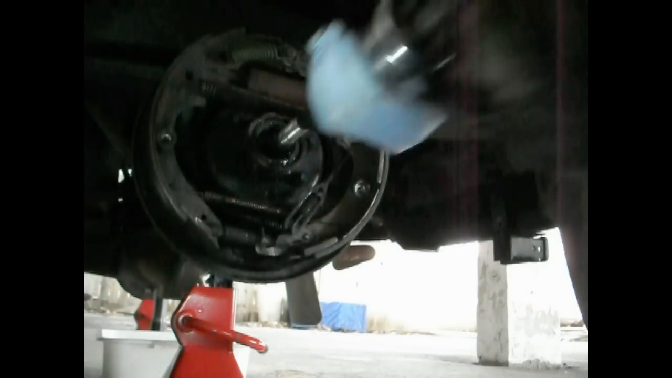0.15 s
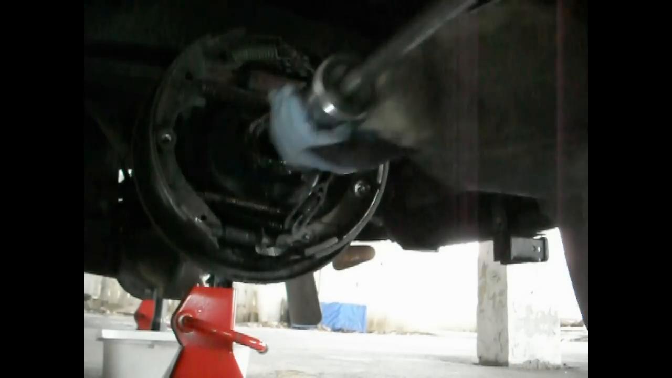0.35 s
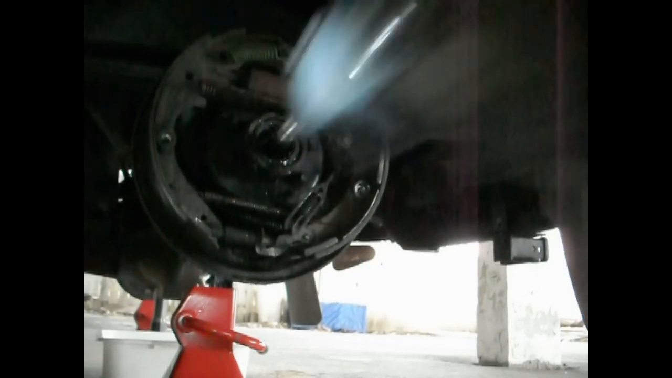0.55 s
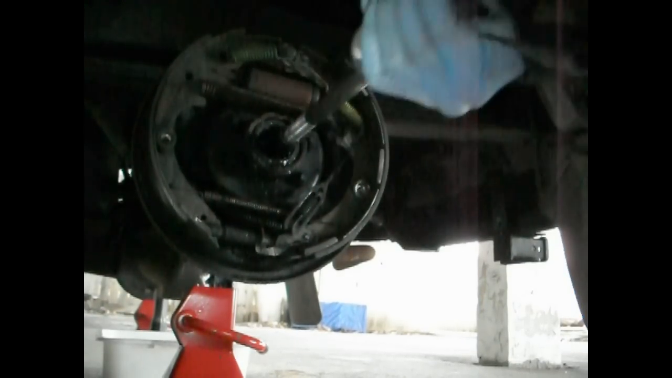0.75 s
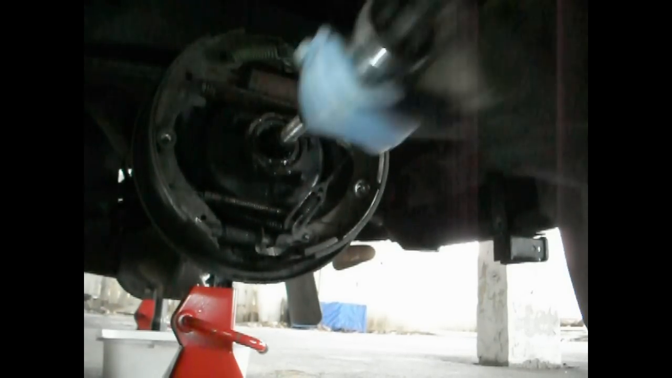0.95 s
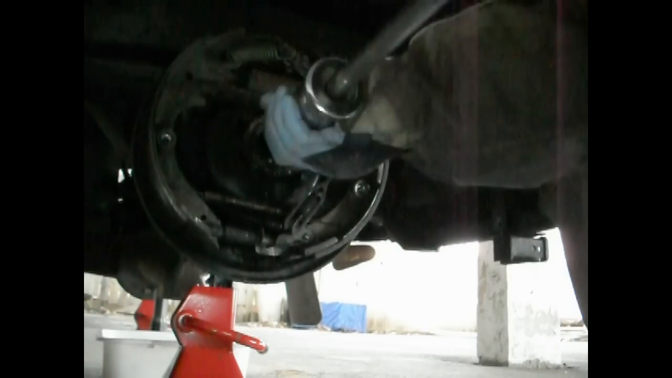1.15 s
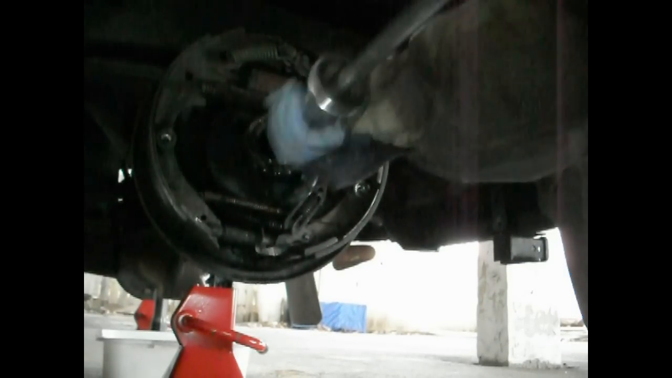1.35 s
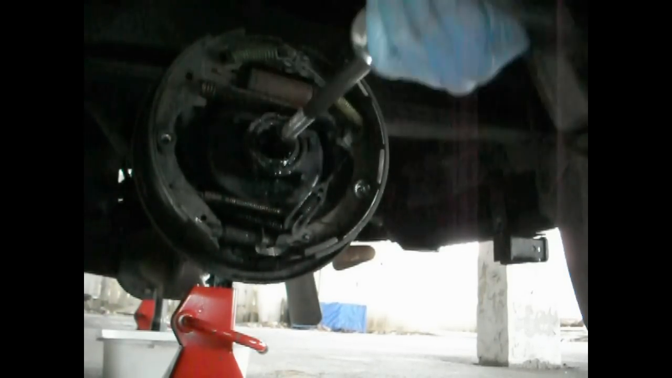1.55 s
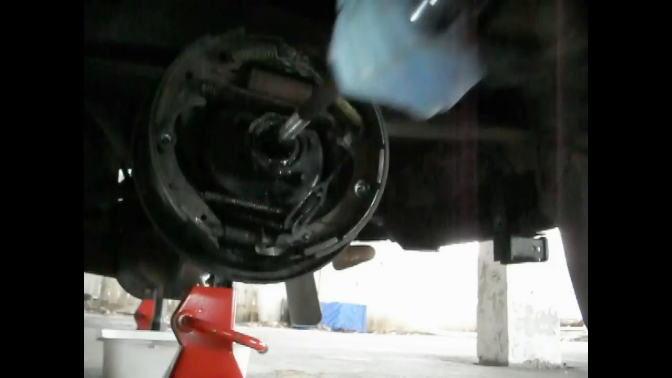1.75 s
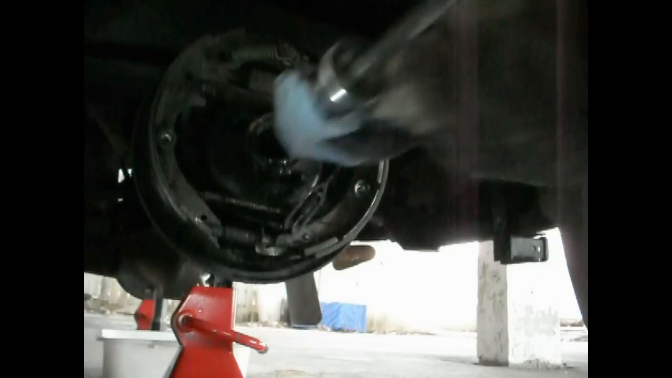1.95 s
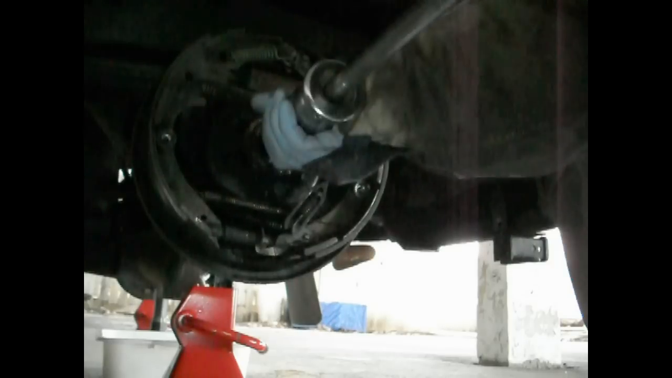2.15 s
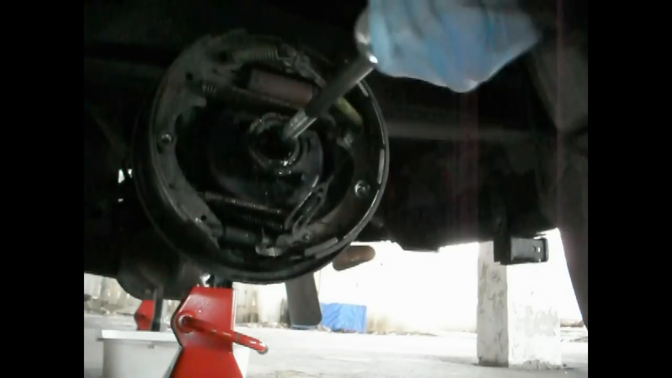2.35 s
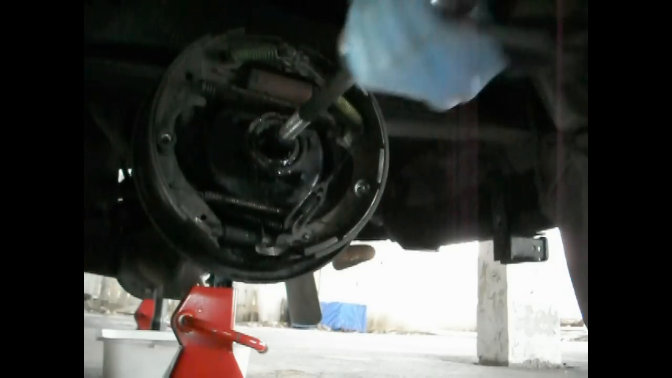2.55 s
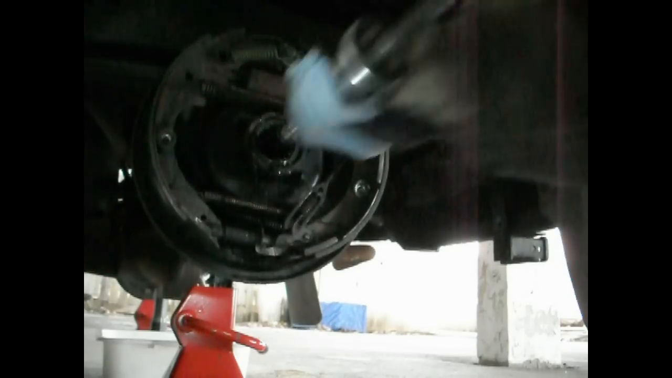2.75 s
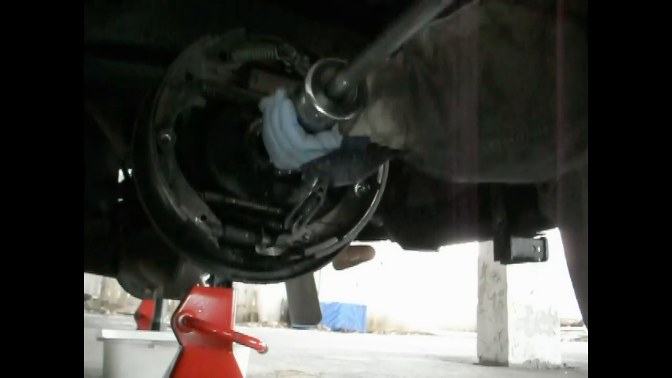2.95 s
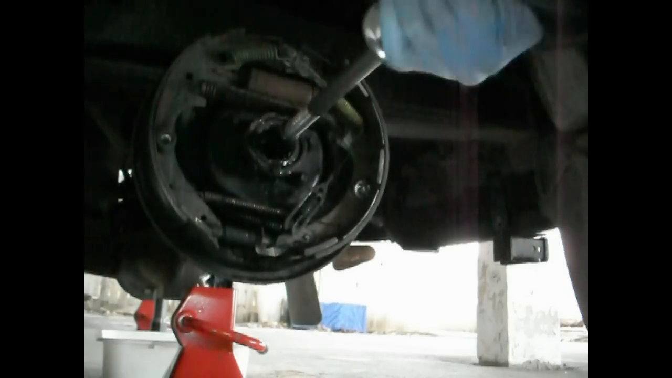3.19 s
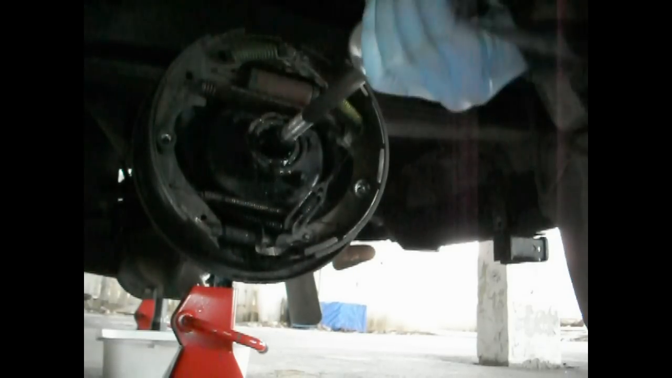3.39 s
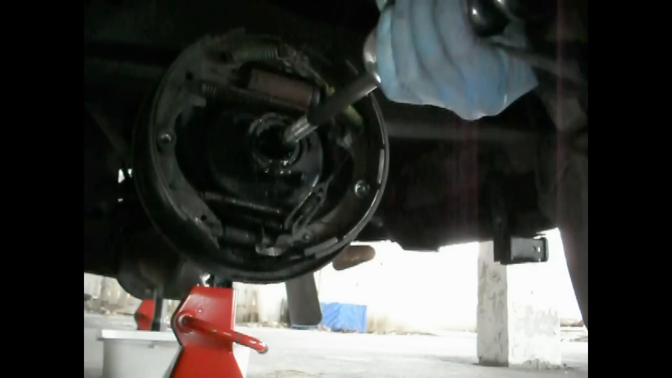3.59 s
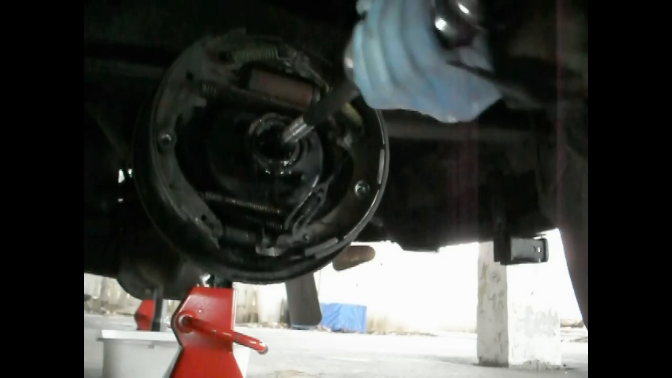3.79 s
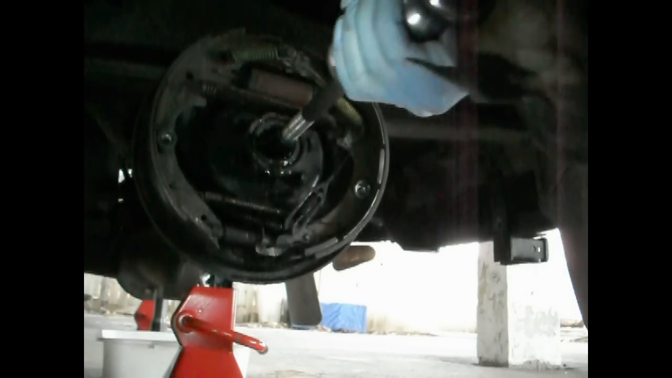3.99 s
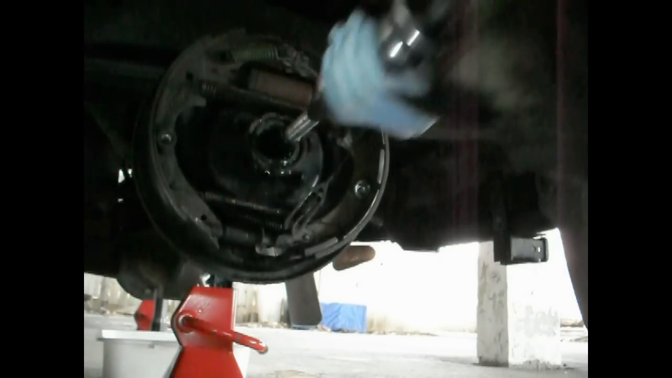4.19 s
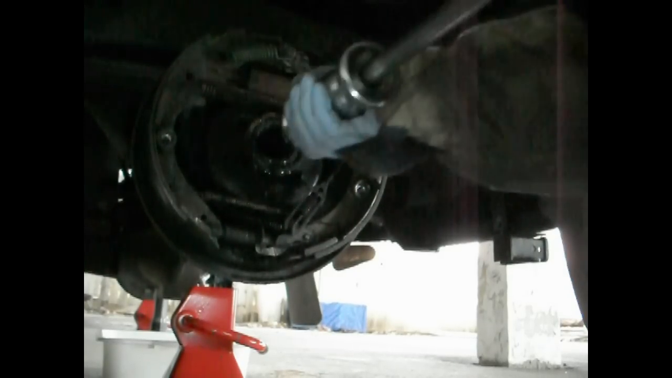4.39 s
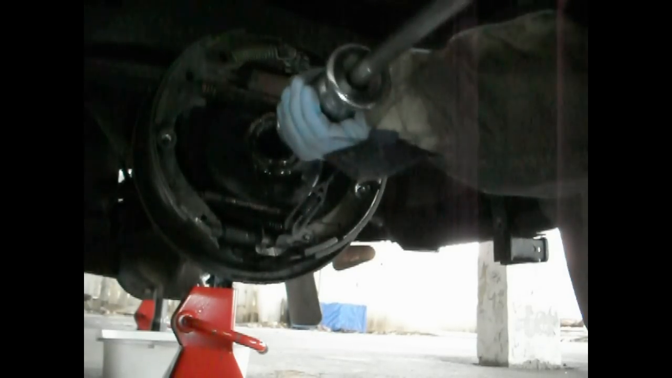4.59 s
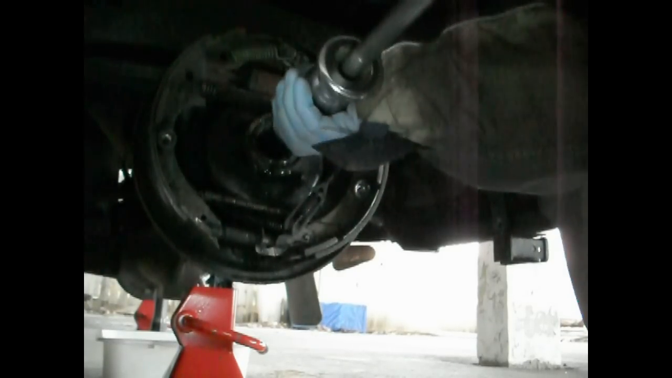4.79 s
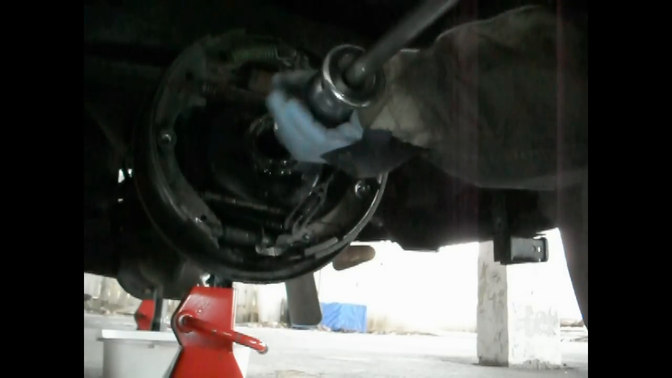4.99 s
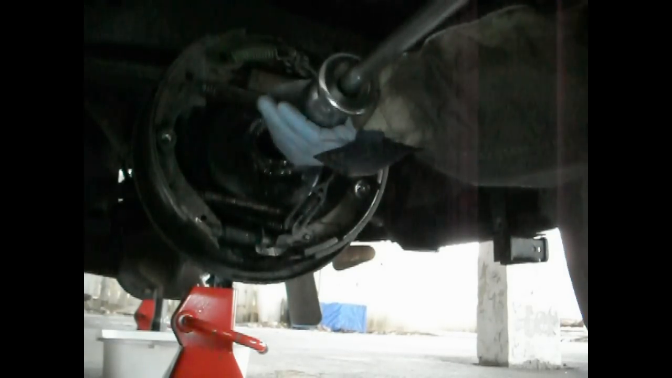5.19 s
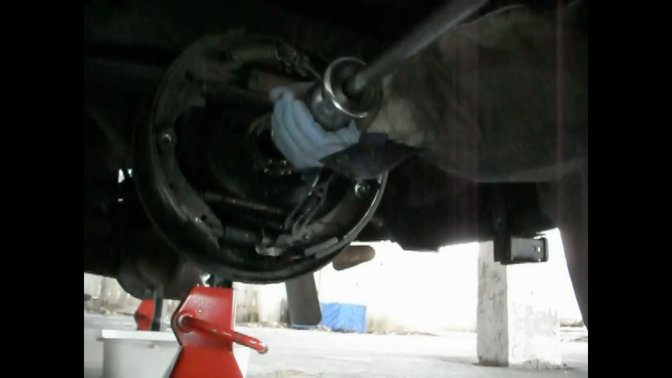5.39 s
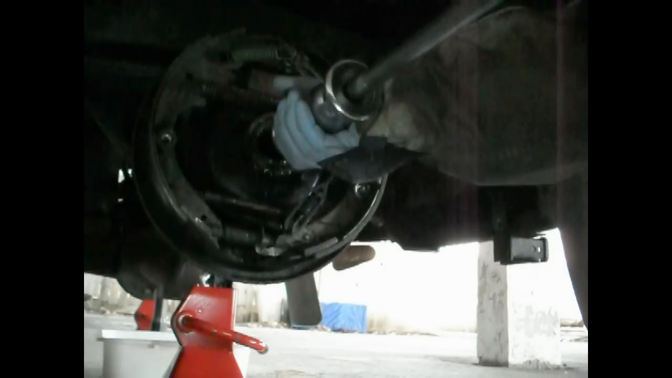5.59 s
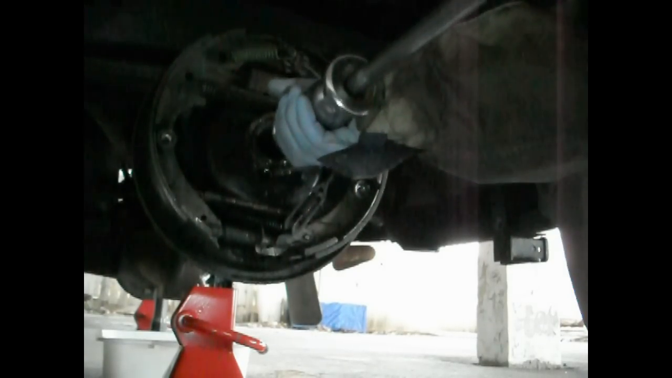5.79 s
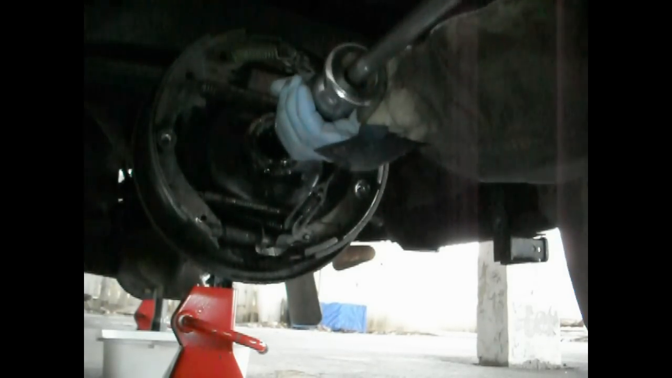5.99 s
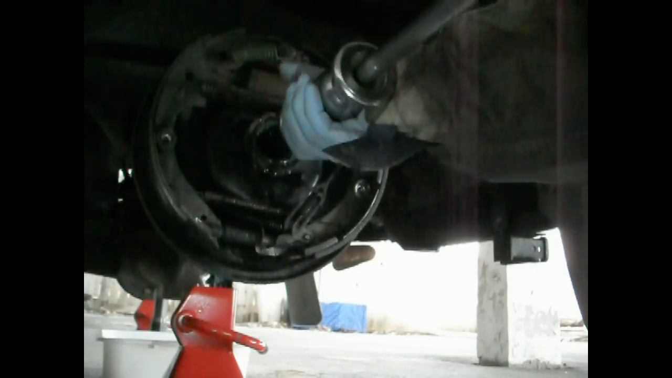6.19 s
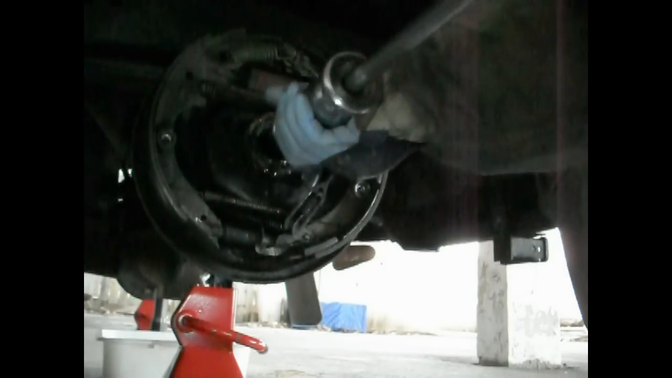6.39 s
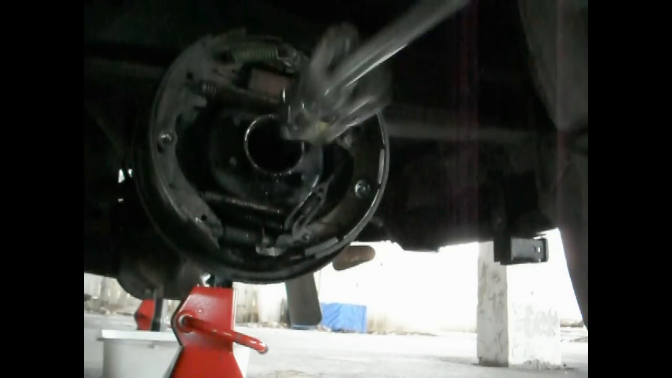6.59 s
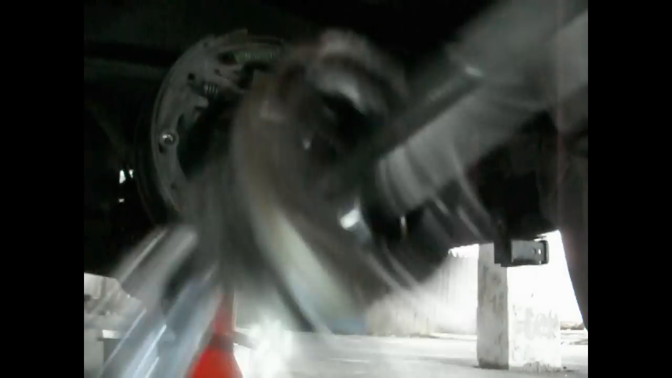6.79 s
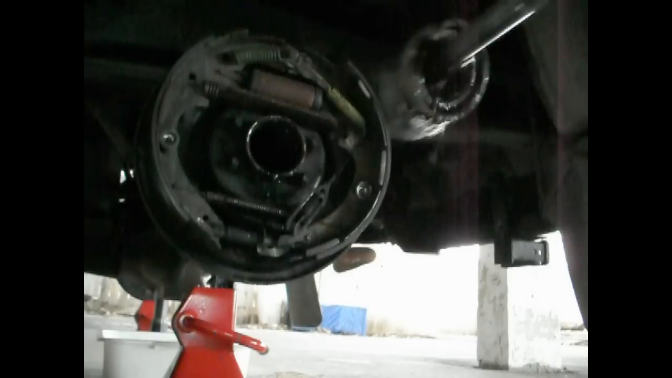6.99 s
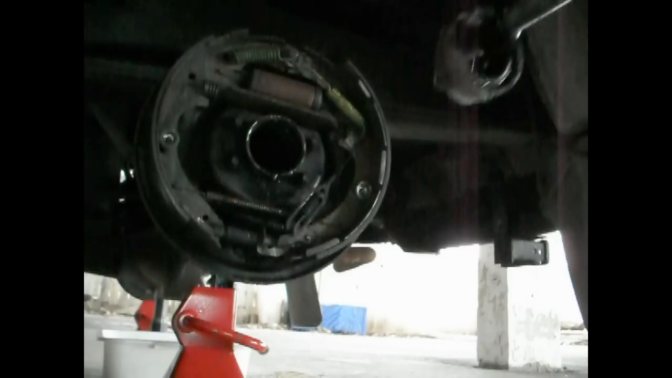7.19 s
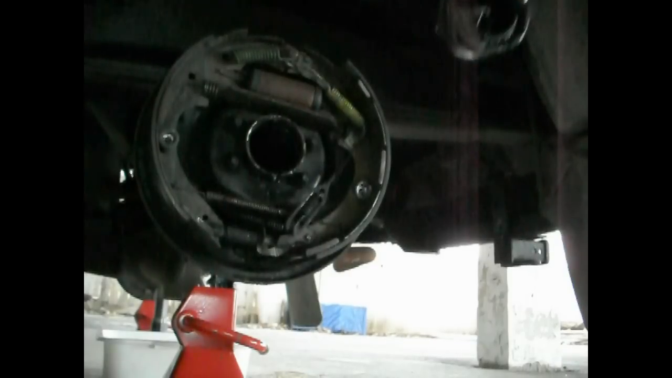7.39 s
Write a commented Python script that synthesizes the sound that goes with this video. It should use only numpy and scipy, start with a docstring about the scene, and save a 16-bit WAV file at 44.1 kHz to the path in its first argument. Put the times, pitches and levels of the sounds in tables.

```python
"""An axle rings down, a steel weight scrapes and clanks, then heavy blows crash and boom in an open garage.
A slide hammer pulls a wheel bearing out of an axle tube, close to a small microphone. Scrapes are random
catches that wake short rings; clanks and blows are shaped noise and decaying modes with weak reflections.
Blows overload the microphone and some throw it off its bias. The last frees the bearing, which rattles out;
a sleeve rustles. Rumble, hiss and a faint whine run throughout."""
import sys
import numpy as np
from scipy import signal
from scipy.fft import rfft, irfft, next_fast_len
from scipy.io import wavfile

SR = 44100
rng = np.random.default_rng(int(sys.argv[2]) if len(sys.argv) > 2 else 0)


def master_out(mix):
    """Clip the mix to full scale and print it as 16-bit PCM to the path in sys.argv[1]."""
    frames = np.transpose(np.atleast_2d(mix))
    ceiling = np.clip(frames, -1, 1)
    pcm = np.round(ceiling * 32767).astype(np.int16)
    wavfile.write(sys.argv[1], SR, pcm)


N = 328104
T = np.arange(int(1.2 * SR)) / SR  # time axis of one event [s]
UNEVEN_DB = 3.8  # spread of chance resonances in crashes and clanks

# weight hits the stop: (time [s], crash [dB], axle ring [dB], thud [dB], boom [dB], microphone swing [factor])
STOP_BLOWS = [(-.42, 0, -10.5, -16, -20, 5.5), (0.5365, 9.5, -17, -11.5, -17.5, 0),
              (1.3877, 8.5, -17, -12, -15.5, 0), (2.2281, 5.5, -17.5, -15, -16.5, 0.91),
              (3.0666, 6.5, -20, -12.5, -17.5, 7), (6.5185, 7, -24.5, -33, -26.5, 1.04)]
# rod rings, damped by the hands: (frequency [Hz], level [dB], t60 [s]); clanks shorten them further
ROD_RINGS = [(3400, 1.5, 0.079), (3870, -2.5, 0.041), (4400, -10.5, 0.066), (4880, 3, 0.036),
             (6100, -12, 0.061), (6900, 7, 0.041), (7800, -16.5, 0.097), (9550, -3, 0.12), (10200, -34, .1)]
# weight eased down the rod onto the near collar:
# (landing [s], slide length [s], slide [dB], clank [dB], favoured note [Hz])
RETURN_STROKES = [(0.353, 0.088, -40, -6.5, 5960), (1.1077, 0.13, -43, -8, 6170),
                  (1.973, .094, -36, -3.5, 5620), (2.8072, 0.083, -33.5, -3.5, 3270)]
# weight flung outward until the next blow:
# (start [s], slide [dB], hardest bite [share of stroke], knock as play is taken up [dB])
PULL_STROKES = [(0.4284, -26.5, 0.54, -13.5), (1.3004, -22, 0.47, -22), (2.15, -17.5, .47, -15),
                (2.977, -18.5, 0.56, -17), (6.447, -18.5, 0.36, -40)]


def undb(db):
    """Decibels to gain."""
    return 10 ** (np.asarray(db) / 20)


def fade(t60_s):
    """Free exponential decay: down 60 dB after t60_s."""
    return np.exp(-np.log(1000) * T / t60_s)


def onset(time_s):
    """Exponential rise from zero towards 1."""
    return 1 - np.exp(-T / time_s)


def flicker(step_s):
    """Random level: a new normal value every step_s, joined by straight lines."""
    knots_s = np.arange(0, T[-1], step_s)
    return np.interp(T, knots_s, rng.standard_normal(len(knots_s)))


def add(track, start_s, sound):
    """Mix a sound in; it may have begun before zero."""
    i = int(start_s * SR)
    part = sound[max(-i, 0):N - i]
    first = max(i, 0)
    track[first:first + len(part)] += part


def colour(x, spectrum, tilt_db=0, uneven_db=0, note_hz=1000, note_db=0):
    """Give x a spectrum, tilted per octave, with chance resonances and one favoured note; rms 1."""
    size = next_fast_len(len(x))
    f_hz = np.fft.rfftfreq(size, 1 / SR)
    octave = np.log2(np.maximum(f_hz, 1))
    hz, db = np.transpose(spectrum)
    gain_db = np.interp(octave, np.log2(hz), db)
    gain_db = gain_db + tilt_db * np.maximum(octave - 12, -1.3)  # pivot 4096 Hz, no further tilt in the lows
    # each contact point on the steel wakes other resonances
    grid_hz = np.arange(0, SR / 2, 130)
    gain_db = gain_db + uneven_db * np.interp(f_hz, grid_hz, rng.standard_normal(len(grid_hz)))
    gain_db = gain_db + note_db / (1 + ((f_hz - note_hz) / 170) ** 2)
    y = irfft(rfft(x, size) * undb(gain_db), size)[:len(x)]
    return y / np.std(y)


def dense(spectrum, **shape):
    """Countless overlapping modes, too close to tell apart: shaped noise."""
    return colour(rng.standard_normal(len(T)), spectrum, **shape)


def ring(modes, scatter_db):
    """Single decaying modes; each hit shares its force out anew, with random phases."""
    total = np.zeros(len(T))
    for hz, db, t60_s in modes:
        level_db = db + scatter_db * rng.standard_normal()
        turn = rng.standard_normal()  # starting phase [cycles]
        total += undb(level_db) * fade(t60_s) * np.sin(2 * np.pi * (hz * T + turn))
    return total


def air():
    """Outdoor rumble and microphone hiss as shaped noise, plus the steady whine of the electronics."""
    # (frequency [Hz], relative density [dB])
    air_spectrum = [(12, -13.5), (20, 3.5), (43, -4.5), (90, -13.5), (125, -15), (278, -20), (337, -22),
                    (419, -25.5), (766, -27.5), (903, -27.5), (1120, -28), (2060, -32.5), (7660, -39),
                    (10400, -46), (14000, -87)]
    # (frequency [Hz], rms level [dB])
    whine_tones = [(3924, -76), (7870, -77.5)]
    noise = undb(-38.5) * colour(rng.standard_normal(N), air_spectrum)
    time_s = np.arange(N) / SR
    whine = sum(undb(db) * np.sqrt(2) * np.sin(2 * np.pi * hz * time_s) for hz, db in whine_tones)
    return noise + whine


def sleeve():
    """Soft cloth rustle that swells and wavers as the tool is lifted away."""
    # (frequency [Hz], relative density [dB])
    cloth_spectrum = [(300, -6), (1500, -2), (4000, 1.5), (8000, -3), (10500, -11), (12500, -37)]
    out = np.zeros(N)
    level_db = -46 + 1.8 * flicker(.04)
    add(out, 6.96, undb(level_db) * onset(.2) * dense(cloth_spectrum))
    return out


def garage(x):
    """Weak diffuse reflections from floor and underbody, as a decaying noise response."""
    spectrum = [(100, 14.5), (3000, -3.0), (7000, -4.5), (10500, -4.5), (12500, -27)]
    echo = dense(spectrum) * fade(0.43) * onset(0.0023)
    return x + undb(-19) * signal.fftconvolve(x, echo / np.linalg.norm(echo))[:N]


def rub(speed):
    """Tiny catches between weight and rod wake short rings; fast strokes (1) are brighter, the rod sings."""
    # both: (frequency [Hz], relative density [dB])
    fast_spectrum = [(100, -27), (1000, -10.5), (2200, 0.5), (3700, 5), (5000, 4.5), (6200, 1.5),
                     (8000, -5), (10400, -20), (11200, -25), (16000, -39.5)]
    slow_spectrum = [(100, -10.5), (800, -1.5), (1400, -9), (2600, 3.5), (3200, -3), (3900, 1.5),
                     (4600, -7.5), (5500, -12.5), (6500, -21), (10000, -27), (12000, -57)]
    squeak_db, catch_spread_db = 4.5, 2.5  # chance resonances; catches differ in force: grit
    grip = undb(2.5 * flicker(.004))
    hits = rng.random(len(T)) < 9000 / SR  # on average 9000 catches per second
    catches = grip * hits * rng.standard_normal(len(T))
    catches = catches * undb(catch_spread_db * np.minimum(rng.exponential(size=len(T)), 4))
    notes = signal.fftconvolve(catches, ring(ROD_RINGS, scatter_db=3))[:len(T)]
    fast = colour(catches, fast_spectrum, uneven_db=squeak_db) + undb(-12) * notes / np.std(notes)
    slow = colour(catches, slow_spectrum, uneven_db=squeak_db)
    return speed * fast + (1 - speed) * slow


def travel(length_s, attack_s):
    """The weight gets going, slides for length_s and stops within milliseconds."""
    return onset(attack_s) * np.exp(-np.maximum(T - length_s, 0) / .004)


def rubs():
    """Steel rubs on steel as the tool is shifted and drawn out: catches that swell and fade."""
    # (peak time [s], rise and fall time each [s], level [dB], speed [0-1])
    rub_events = [(0.252, 0.013, -38.5, 0.45), (4.319, 0.067, -40, 0.32), (6.685, 0.032, -19, 1),
                  (6.955, 0.043, -40, 0.75)]
    out = np.zeros(N)
    for peak_s, rise_s, db, speed in rub_events:
        pressure = np.sin(np.pi / 2 * np.minimum(T / rise_s, 2)) ** 2
        add(out, peak_s - rise_s, undb(db) * pressure * rub(speed))
    return out


def return_slides():
    """Slow scrapes back down the rod; the hand presses unevenly."""
    out = np.zeros(N)
    for landing_s, length_s, db, *_ in RETURN_STROKES:
        pressure = travel(length_s, attack_s=0.0061) * undb(3 * flicker(0.011))
        add(out, landing_s - length_s, undb(db) * pressure * rub(speed=0.19))
    return out


def pull_slides():
    """Fast strokes that bite partway, glide more quietly around the bite and end at the stop."""
    bite_width, glide_db = .22, -13.5  # width as a share of the stroke
    out = np.zeros(N)
    for start_s, db, bite_at, _ in PULL_STROKES:
        length_s = min(blow[0] for blow in STOP_BLOWS if blow[0] > start_s) - start_s
        bite = np.exp(-((T / length_s - bite_at) / bite_width) ** 2)
        pressure = travel(length_s, attack_s=0.0052) * undb(glide_db * (1 - bite))
        add(out, start_s, undb(db) * pressure * rub(speed=0.91))
    return out


def clanks(contacts, modes, crack_db, modes_db, note_db, contact_s):
    """Light steel contacts: a short bright crack, then the notes of the struck part."""
    # (frequency [Hz], relative density [dB])
    crack_spectrum = [(60, -1.5), (400, -12), (900, -5), (2000, -3), (3800, 1.5), (6300, -1.5), (8000, -5),
                      (9000, -13), (10400, -7.5), (11000, -34.5), (11700, -19), (12500, -41),
                      (16000, -32.5)]
    out = np.zeros(N)
    for start_s, db, hz, t60_s, tilt_db in contacts:
        crack = dense(crack_spectrum, tilt_db=tilt_db, uneven_db=UNEVEN_DB, note_hz=hz, note_db=note_db)
        crack = crack * fade(t60_s)
        # whatever damps the crack also shortens the notes
        notes = ring(modes, scatter_db=3) * fade(5 * t60_s)
        mix = undb(crack_db) * crack + undb(modes_db) * notes
        add(out, start_s, undb(db) * mix * onset(contact_s))
    return out


def collar():
    """Contacts of each return landing on the near collar; the tilt is in dB per octave."""
    t60_s, tilt_db = 0.077, 1.54
    return [(landing_s, db, hz, t60_s, tilt_db) for landing_s, _, _, db, hz in RETURN_STROKES]


def play():
    """The weight knocks on the rod as pulls start, as it rebounds and as it is handled; harder is brighter."""
    # (time [s], level [dB], favoured note [Hz])
    loose_knocks = [(0.441, -15, 6150), (0.5169, -9, 4430), (1.1258, -18, 3830), (1.3681, -11, 4700),
                    (1.3756, -13.5, 5100), (1.4892, -17.5, 5070), (1.5388, -18, 2120),
                    (1.8105, -27.5, 4000), (2.1898, -13, 3430), (2.3679, -17.5, 2120), (2.551, -29.5, 3200),
                    (2.8398, -15, 3930), (3.9703, -33.5, 1800), (4.5073, -27.5, 3260), (5.843, -26, 3860)]
    t60_s, tilt_db, brighter_per_db = 0.049, 3.5, 0.21  # tilt per octave for a 0 dB knock
    take_up_hz = 4120
    knocks = [(start_s, db, take_up_hz) for start_s, *_, db in PULL_STROKES] + loose_knocks
    return [(start_s, db, hz, t60_s, tilt_db + brighter_per_db * db) for start_s, db, hz in knocks]


def weight():
    """The weight strikes collar and rod, and the rod rings briefly."""
    return clanks(collar() + play(), ROD_RINGS, crack_db=-4.5, modes_db=-22.0, note_db=7.5, contact_s=0.00065)


def bearing():
    """The freed bearing rattles on tube and jaws; all its contacts share one spectral tilt."""
    # (time [s], level [dB], favoured note [Hz], t60 [s])
    rattle_hits = [(6.6064, -11.5, 7350, 0.031), (6.6578, 2, 7860, 0.069), (6.6725, 0, 4490, 0.045),
                   (6.7105, -1, 4260, 0.035), (6.779, -11, 5400, 0.02), (6.8102, -21, 4340, 0.043),
                   (6.823, -8, 6150, .04), (6.846, -11.5, 8200, 0.047), (6.8669, -10.5, 10200, 0.088),
                   (6.8946, -6.5, 4730, 0.048), (6.9025, -10, 5130, 0.05), (6.9098, -9.5, 4130, 0.042),
                   (6.937, -19, 4150, 0.065), (7.0063, -29, 5040, 0.085)]
    # race rings: (frequency [Hz], level [dB], t60 before contact damping [s])
    race_rings = [(3250, 3, .06), (4080, 2, 0.076), (4490, 3, 0.045), (6030, 5.5, 0.035), (8040, -9, 0.034),
                  (7930, -14, .07), (8100, -5, 0.049), (10440, -6, 0.12), (10800, -7, 0.076),
                  (11670, -10, 0.063)]
    contacts = [(*hit, 3.5) for hit in rattle_hits]  # tilt [dB per octave]
    return clanks(contacts, race_rings, crack_db=-8, modes_db=-22.5, note_db=13, contact_s=0.0002)


def axle():
    """Axle, plate and garage ring on after a blow; each band wavers and dies at its own pace."""
    # (frequency [Hz], relative density [dB])
    axle_spectrum = [(60, -18.5), (150, -1.5), (300, 3), (800, -2.5), (1100, -5), (1400, -9), (2200, -4.5),
                     (3000, -8.5), (4100, -13), (5200, 1), (6500, -10.5), (10000, -21.5), (11500, -37.5),
                     (16000, -63.5)]
    # (band centre [Hz], t60 [s])
    band_decays = [(60, 1), (300, 0.6), (800, 0.96), (1400, 0.79), (2400, 0.83), (3800, 0.78), (5300, 0.54),
                   (8000, 0.52), (12000, 0.32)]
    # long rings of axle tube and brake plate: (frequency [Hz], level [dB], t60 [s])
    axle_rings = [(158, 0, .5), (344, 0, .42), (483, 0, .42), (563, -4, .42), (614, -5, .42),
                  (712, -3, .45), (795, -2, .7), (1024, -2, .4), (1104, -8, .5), (1884, -11, .45),
                  (2121, -6, .55), (2358, -13, .7), (2595, -7, .75), (3241, -11, .5), (3308, -12, .5),
                  (4678, -13, .45), (4834, -10, .4), (5027, -9, .4), (5218, -7, .42), (5459, -9, .4),
                  (5892, -11, .42)]
    body = rfft(dense(axle_spectrum, uneven_db=1.5))
    octave = np.log2(np.maximum(np.fft.rfftfreq(len(T), 1 / SR), 1))
    hz, t60s = np.transpose(band_decays)
    tail = np.zeros(len(T))
    # each row of the identity opens one overlapping band
    for share, t60_s in zip(np.eye(len(hz)), t60s):
        band = irfft(body * np.interp(octave, np.log2(hz), share), len(T))
        tail += band * fade(t60_s) * undb(2.2 * flicker(.012))
    return (tail + undb(-6.5) * ring(axle_rings, scatter_db=1.5)) * onset(.006)


def body_boom():
    """The vehicle body answers late: a noisy panel boom and an unsteady low tone that swells."""
    # (frequency [Hz], relative density [dB])
    boom_spectrum = [(30, -21), (65, -3), (105, 0), (160, -6), (230, -16), (700, -61)]
    panels = dense(boom_spectrum) * fade(0.66) * onset(0.039)
    swell = np.exp(-((T - .11) / .07) ** 2) * onset(.02)
    cycles = 101.06 * T + .14 * flicker(.03)  # main boom [Hz] with random phase wander
    tone = np.sin(2 * np.pi * cycles) * swell * undb(3.1 * flicker(.025))
    return panels + undb(-7.5) * tone


def blows():
    """The stop crashes at once, the axle tube knocks dully under the load and rings, the body booms."""
    # both: (frequency [Hz], relative density [dB])
    crash_spectrum = [(40, -3), (200, -7.5), (800, -6.5), (1400, -8.5), (2400, -2.5), (3500, -4.5),
                      (5200, -2), (7500, -6.5), (10000, -11.5), (11200, -21), (16000, -44)]
    thud_spectrum = [(50, -15.5), (150, -4.5), (300, 0), (500, 1), (800, -1.5), (1050, 4), (1400, -23),
                     (3000, -22.5), (8000, -48)]
    out = np.zeros(N)
    for start_s, crash_db, ring_db, thud_db, boom_db, _ in STOP_BLOWS:
        crash = dense(crash_spectrum, uneven_db=UNEVEN_DB) * fade(0.088) * onset(0.0017)
        thud = dense(thud_spectrum) * fade(0.27) * onset(0.005)
        hit = undb(crash_db) * crash + undb(thud_db) * thud
        add(out, start_s, hit + undb(ring_db) * axle() + undb(boom_db) * body_boom())
    return out


def swing():
    """Some blows throw the microphone off its bias; it swings up, flips down and creeps back."""
    throw = np.exp(-T / .074) * (1 - T / .046) * (1 - T / .216)  # changes sign at 46 and 216 ms
    throw = throw * (1 - np.exp(-(T / .0021) ** 4))
    flip = 1 + .7 * np.exp(-((T - .046) / .018) ** 2)  # steeper around the first sign change
    creep = .009 * np.sin(np.pi * T / T[-1]) ** 2
    out = np.zeros(N)
    for start_s, *_, size in STOP_BLOWS:
        add(out, start_s, size * (throw * flip + creep))
    return out


def scene():
    """All sounds at the microphone; only the steel sounds get reflections."""
    slides = rubs() + return_slides() + pull_slides()
    steel = slides + weight() + bearing() + blows()
    return (air() + sleeve() + garage(steel) + swing())[None]


def record(dry):
    """The preamplifier clips, and goes mute while a swing pins it to the rail; the top is cut."""
    rail, top_hz = .62, 15900
    low_pass = signal.ellip(8, .2, 70, top_hz, fs=SR, output="sos")
    return signal.sosfilt(low_pass, np.clip(dry, -rail, rail))


dry = scene()
out = record(dry)
master_out(out)
```